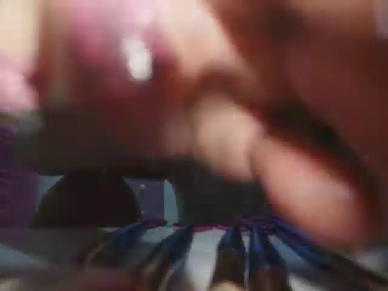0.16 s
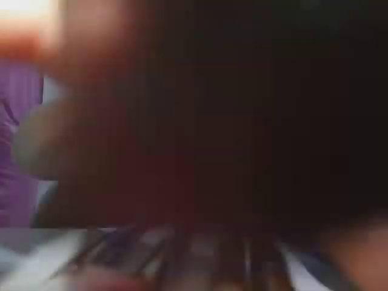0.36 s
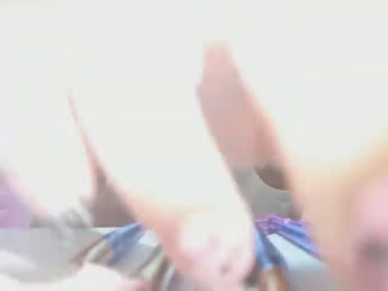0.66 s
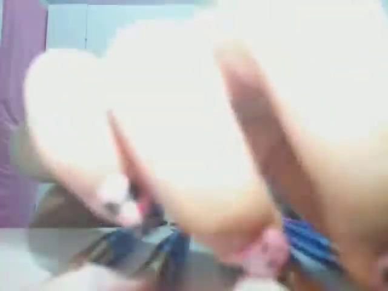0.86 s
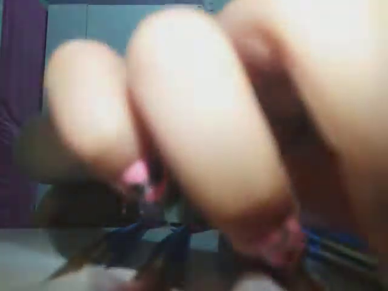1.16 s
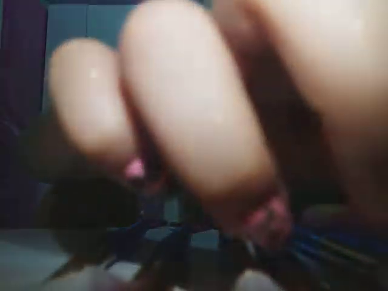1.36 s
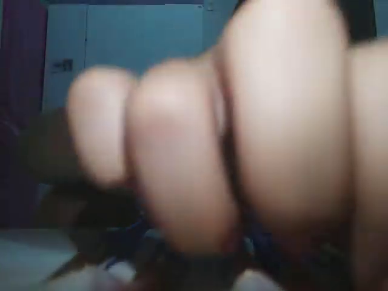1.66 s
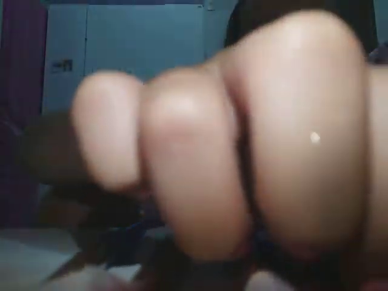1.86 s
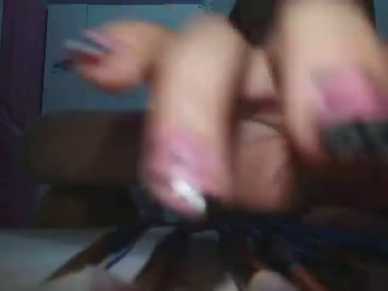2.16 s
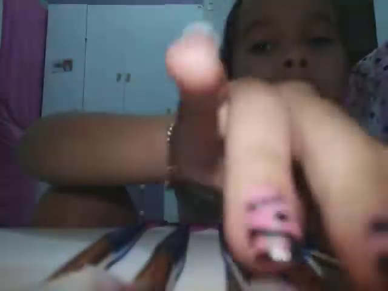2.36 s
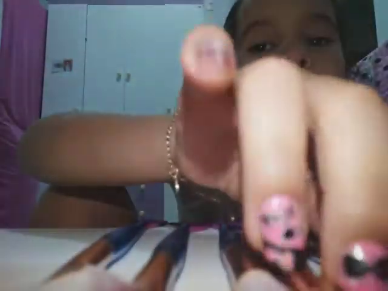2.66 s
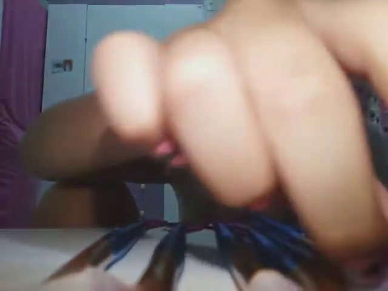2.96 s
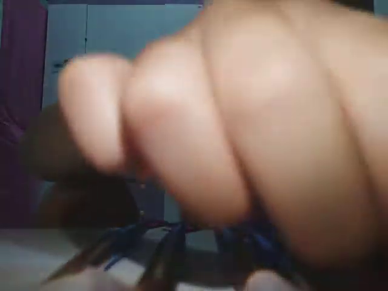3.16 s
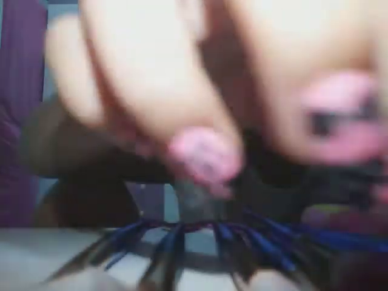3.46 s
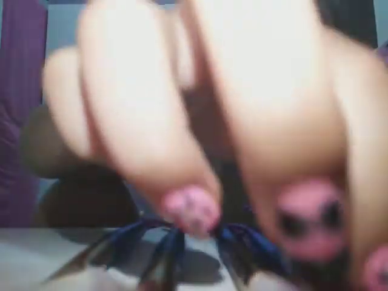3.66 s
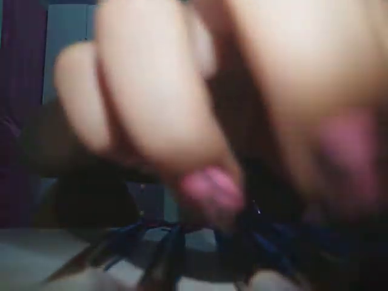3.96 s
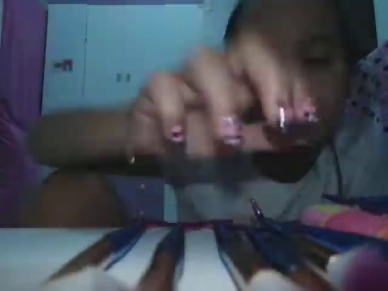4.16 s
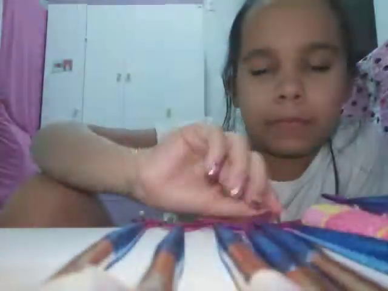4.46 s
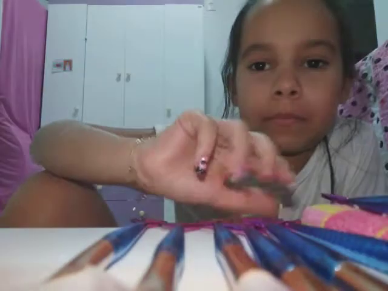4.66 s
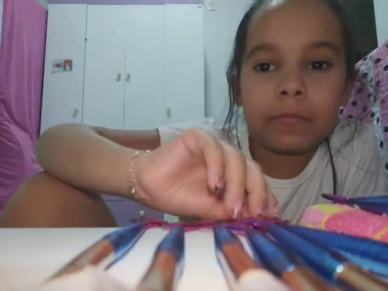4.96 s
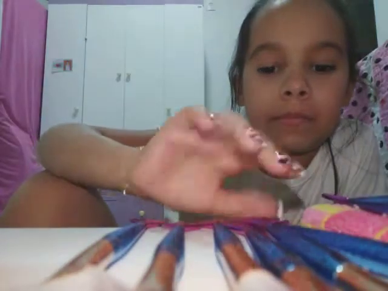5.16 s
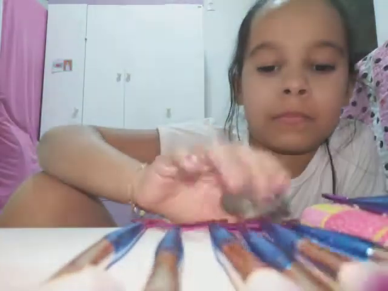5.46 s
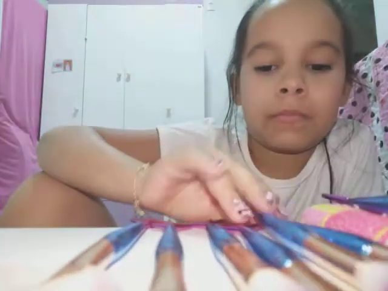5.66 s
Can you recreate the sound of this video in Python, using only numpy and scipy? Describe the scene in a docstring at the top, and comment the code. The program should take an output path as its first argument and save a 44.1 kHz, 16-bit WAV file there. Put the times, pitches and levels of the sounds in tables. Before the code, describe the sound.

A very close, dry sound of makeup brushes handled on a hollow table in a quiet bedroom, over faint low rumble and microphone hiss. Tiny ticks begin at 0.2 seconds, with a short whistling slide of nails or skin around 0.3 and a clack at 0.43. From 0.7 to 1.1 handles roll and clatter, with a bright metal clink at 0.8. After a pause, faint ticks near 1.5 lead to clacks at 1.7 to 1.85. Another hush ends at 2.2 with a brief hiss, then uneven rattling runs to 3.2, including ferrule clinks near 2.85. A hard knock with a low table thump lands at 3.26. Softer rolling follows at 3.65 to 3.95. A loud, sharp clatter breaks out at 4.4 and thins towards 4.9. After a gap, a dull roll at 5.26, crisp clacks at 5.4 and clinks at 5.6 to 5.7 finish, leaving hush.

```python
"""Brush handles on a hollow table

A quiet bedroom; a small camera stands on the table top where fingers roll and push makeup brush handles.
Handles clack and metal ferrules clink: short contacts ringing resonant modes, each with a bright tick.
Rolling is bursty noise that rings and thumps the table top, with chatter and rasp from the handles.
Nails and skin slide as hissing grain with broad whistles; room rumble and microphone hiss lie beneath.
"""
import sys
import numpy as np
from scipy import signal
from scipy.fft import rfft, irfft, next_fast_len
from scipy.io import wavfile

SR = 44100
rng = np.random.default_rng(int(sys.argv[2]) if len(sys.argv) > 2 else 0)


def int16_out(signal):
    """Quantize to a 16-bit WAV file."""
    q = np.round(np.clip(np.atleast_2d(signal).T, -1, 1) * 32767)
    wavfile.write(sys.argv[1], SR, q.astype(np.int16))


N = 255708  # samples in the scene


def gain_of(db):
    """Decibels to an amplitude factor."""
    return 10 ** (np.asarray(db) / 20)


def evened(x):
    """Scales to rms 1."""
    return x / np.sqrt(np.mean(x ** 2) + 1e-20)


def peaked(x):
    """Scales to peak 1."""
    return x / (abs(x).max() + 1e-12)


def coloured(x, points):
    """Filters by a spectrum of (f/Hz, level/dB) points, joined by straight lines over log frequency."""
    hz, db = np.transpose(points)
    size = next_fast_len(x.shape[-1])
    log_hz = np.log(np.fft.rfftfreq(size, 1 / SR) + 1)
    gain = gain_of(np.interp(log_hz, np.log(hz), db))
    return irfft(rfft(x, size) * gain, size)[..., :x.shape[-1]]


def rung(force, modes):
    """A force rings the modes of a body; each level is the height of a resonance peak."""
    out = np.zeros(len(force))
    for k, (hz, width, db) in enumerate(modes):
        r = np.exp(-np.pi * width / SR)  # a wider mode dies sooner
        pole = r * np.exp(2j * np.pi * hz / SR)
        mode = signal.lfilter([1 - r], [1, -pole], force).imag
        out += (-1) ** k * gain_of(db) * mode
    return out


def varied(modes, tune, height, spread_db):
    """No two contacts ring a body alike: pitches and heights of its modes shift a little."""
    hz, width, db = np.transpose(modes)
    count = len(hz)
    return np.transpose([hz * (1 + .018 * tune[:count]), width, db + spread_db * height[:count]])


def tinted(points, shifts, spread_db):
    """Shifts the levels of a spectrum's points at random."""
    return [(hz, db + spread_db * shift) for (hz, db), shift in zip(points, shifts)]


def dulled(force, hz):
    """A softer contact lasts longer and so loses its treble."""
    lowpass = signal.butter(3, np.clip(hz, 2000, SR / 3), fs=SR, output="sos")
    return signal.sosfilt(lowpass, force)


def bumps(per_s, spread_db, length_s):
    """Uneven rubbing or rolling force: noise in short bursts of random size."""
    size = gain_of(spread_db * np.minimum(rng.exponential(1, N), 4))
    starts = size * (rng.random(N) < per_s / SR)
    swell = signal.lfilter([1], [1, -np.exp(-1 / (length_s * SR))], starts)
    return swell * rng.standard_normal(N)


def touch(length_s, attack_s, fade_db_per_s):
    """The envelope of one touch: rise, hold, then an even fade in dB."""
    t = np.arange(round(.3 * SR + length_s * SR)) / SR  # leaves 0.3 s for the fade
    rise = np.sin(np.pi / 2 * np.minimum(t / attack_s, 1)) ** 2
    return rise * gain_of(-fade_db_per_s * np.maximum(t - length_s, 0))


# spectrum of the room and microphone noise: f/Hz, relative level/dB
HUSH_SPECTRUM = [(30, -12), (158, 5), (248, -13), (1270, -19.5), (3970, -26), (11100, -26), (15200, -25.5),
                 (16500, -50.5)]
# a faint fuzzy tone in the hush: f/Hz, width/Hz, level/dB re hush
WHINE_TONE = [(1930, 31, -17)]


def hush(level_db=-68.5):
    """Room rumble and microphone hiss with a faint tone of narrow-band noise, lower at the very start."""
    whine = gain_of(WHINE_TONE[0][2]) * evened(rung(rng.standard_normal(N), WHINE_TONE))
    noise = evened(coloured(rng.standard_normal(N), HUSH_SPECTRUM))
    rise_db = np.interp(np.arange(N) / SR, [.18, .3], [-5.5, 0])
    return gain_of(level_db + rise_db) * (noise + whine)


def bedroom(x, t60=0.16):
    """A short soft tail of sparse random reflections, duller than the direct sound."""
    t = np.arange(SR // 2) / SR
    signs = rng.choice([-1., 1.], len(t))
    taps = signs * (rng.random(len(t)) < 1 / 20) * gain_of(-60 * t / t60)
    taps = coloured(taps, [(1000, -1.5), (12000, -12.0)])
    return signal.oaconvolve(x, taps / np.linalg.norm(taps))[:N]


# bright spectrum of slides, ticks and rasp: f/Hz, level/dB
TICK_SPECTRUM = [(3000, -13), (5200, 1), (10500, 0), (15000, -0.5), (16300, -26)]
# nails and skin along the handles: start t/s, rise/s, length/s, hiss level/dB, whistle level/dB re hiss
SLIDE_TOUCHES = [(0.306, 0.082, 0.068, -47.5, 7), (2.202, 0.0035, 0.055, -48.5, -22),
                 (4.063, 0.038, 0.1, -67.5, -19)]
# broad whistles in a slide, rung twice over: f/Hz, width/Hz and level/dB of one pass
WHISTLE_MODES = [(2240, 1100, -1), (4670, 910, 0)]


def sliding(fade_db_per_s=604):
    """Nails and skin slide: dense grain is a bright hiss and rings broad whistles."""
    grain = bumps(per_s=5000, spread_db=1.5, length_s=.003)
    hiss = evened(coloured(grain, TICK_SPECTRUM))
    whistle = evened(rung(rung(grain, WHISTLE_MODES), WHISTLE_MODES))
    out = np.zeros(N)
    for s, rise_s, length_s, db, whistle_db in SLIDE_TOUCHES:
        shape = gain_of(db) * touch(length_s, rise_s, fade_db_per_s)
        now = slice(round(s * SR), round(s * SR) + len(shape))
        out[now] += shape * (hiss[now] + gain_of(whistle_db) * whistle[now])
    return out


# modes of the brush handles: f/Hz, width/Hz, level/dB
HANDLE_MODES = [(1507, 93, -7.5), (2074, 190, 1), (2574, 188, 3), (3150, 390, -6.5), (3948, 280, -1.5),
                (5310, 1100, -10.5)]


def knocking(count=5):
    """Small knocks of several handles, each with its own ring (chatter) and bright edge (rasp)."""
    ring, edge = np.zeros(N), np.zeros(N)
    for tune, height, tints in rng.standard_normal((count, 3, len(HANDLE_MODES))):
        force = bumps(per_s=60, spread_db=2.5, length_s=.002)
        ring += rung(force, varied(HANDLE_MODES, tune, height, spread_db=5.0))
        edge += coloured(force, tinted(TICK_SPECTRUM, tints, spread_db=5.0))
    return evened(ring), evened(edge)


# low thump of the hollow table top: f/Hz, width/Hz, level/dB
THUMP_MODES = [(139.2, 28.5, 3.5), (170.5, 50.4, 4), (241.6, 92.5, -6.5)]
# ring of the table top: f/Hz, width/Hz, level/dB
RING_MODES = [(381.9, 8.3, -2.5), (470.5, 47, -5), (690.6, 61.2, 3), (774, 73, 2.5), (1233, 128, -9.5)]
# handles rolled under the fingers: start t/s, length/s, table ring level/dB, thump level/dB re ring,
# hardness (0 soft, 1 hard; more than 1 chatters and rasps louder still)
ROLL_TOUCHES = [(0.2, 0.2, -51, 7.5, 0.7), (0.403, 0.0095, -33, -9.5, 0.1), (0.684, 0.055, -25, -5.5, 0.21),
                (0.762, 0.076, -33, -12.5, 0.58), (0.86, 0.075, -38.5, -12.5, 0.64),
                (0.955, 0.15, -37.5, -3.5, 0.41), (1.513, 0.1, -54.5, 1.5, 0.7),
                (1.61, .085, -38, -3, 0.49), (1.693, 0.21, -40, -8.5, 0.47),
                (2.203, 0.055, -39.5, -20.5, 0), (2.272, 0.039, -41, 3.5, 0.98),
                (2.34, 0.072, -33, -7.5, 0.78), (2.521, 0.085, -38.5, -17, 0.74),
                (2.776, 0.13, -35, 0.5, 0.69), (2.921, 0.086, -31.5, -6.5, 0.1),
                (3.065, 0.042, -32.5, -0.5, 0.4), (3.167, 0.039, -30.5, -1, 0.5),
                (3.253, 0.033, -37.5, 15.5, 0.6), (3.626, 0.011, -50, 18, 0.3),
                (3.654, 0.018, -32.5, -7.5, 0.48), (3.719, 0.036, -28, -11.5, 0.01),
                (3.835, 0.06, -41, 5.5, 0.51), (3.901, 0.045, -37, 6, 0.2), (4.352, 0.036, -34, -8, 0.24),
                (4.413, 0.082, -26.5, -3, 1), (4.493, .07, -36, 0.5, 0.68), (4.806, 0.094, -32.5, -2, 0.75),
                (4.896, 0.044, -27.5, -10, 0.73), (5.233, 0.024, -44.5, 10.5, 0.21),
                (5.264, .12, -20.5, -18, 0.14), (5.395, 0.073, -31.5, -5, 0.97),
                (5.556, 0.12, -27, -8.5, 0.72), (5.677, 0.051, -39, -4, 1.6)]


def rolling():
    """Handles roll and shake the table top; harder contacts chatter and rasp more and brighter."""
    chatter_soft_db, chatter_hard_db = -14.5, -2.5  # re table ring, at hardness 0 and 1
    rasp_soft_db, rasp_hard_db = -35.5, -17  # likewise
    table_fade, handle_fade = 502.5, 1099.5  # dB/s: the handles fall silent sooner than the table top
    load = bumps(per_s=1500, spread_db=1.3, length_s=.006)
    thump = evened(rung(bumps(per_s=250, spread_db=1.2, length_s=.01), THUMP_MODES))
    hard, rasp = knocking()
    soft = evened(rung(dulled(load, hz=2980), HANDLE_MODES))
    out = np.zeros(N)
    chance = rng.standard_normal((len(ROLL_TOUCHES), 2, len(RING_MODES)))
    for (s, length_s, db, thump_db, hardness), (tune, height) in zip(ROLL_TOUCHES, chance):
        share = np.clip(hardness, 0, 1)
        # soft contacts swell over much of their length, hard ones start almost at once
        rise_s = 0.006 + 0.9 * length_s * (1 - share) ** 2
        table_shape = gain_of(db) * touch(length_s, rise_s, table_fade)
        handle_shape = gain_of(db) * touch(length_s, rise_s, handle_fade)
        now = slice(round(s * SR), round(s * SR) + len(table_shape))

        chatter_db = chatter_soft_db + (chatter_hard_db - chatter_soft_db) * hardness
        rasp_db = rasp_soft_db + (rasp_hard_db - rasp_soft_db) * hardness
        chatter = share * hard[now] + (1 - share) * soft[now]
        handles = gain_of(chatter_db) * chatter + gain_of(rasp_db) * rasp[now]

        ring = evened(rung(load[now], varied(RING_MODES, tune, height, spread_db=3.5)))
        table = ring + gain_of(thump_db) * thump[now]
        out[now] += table_shape[:len(table)] * table + handle_shape[:len(table)] * handles
    return out


def add(mix, s, sound):
    """Mixes a sound in at a time in seconds."""
    part = mix[round(s * SR):][:len(sound)]
    part += sound[:len(part)]


def struck(rows, body):
    """A snap and a rough contact ring a body, each time a little differently, and push the table top."""
    snap_s, contact_s, scrape_s, push_s = 0.00008, 0.0079, 0.0059, 0.0042
    grit_db, thump_db = -11, -14  # grit re snap, thump re table ring
    out, t = np.zeros(N), np.arange(5000) / SR
    chance = rng.standard_normal((len(rows), 5, 10))
    noises = rng.standard_normal((len(rows), 3, len(t)))
    for row, shifts, (grit, hiss, rough) in zip(rows, chance, noises):
        s, db, tick_db, ring_db = row
        tune, height, table_tune, table_height, tints = shifts
        force = np.exp(-t / snap_s) + gain_of(grit_db) * grit * np.exp(-(t / contact_s) ** 2)
        force = dulled(force, 14000 * gain_of(0.48 * tick_db))  # a stronger tick, a harder contact
        sound = peaked(rung(force, varied(body, tune, height, spread_db=2.0)))

        scrape = np.exp(-t / scrape_s)  # the tick starts sharply and leaves a short scrape
        tick = coloured(hiss, tinted(TICK_SPECTRUM, tints, spread_db=4.5)) * scrape
        sound += gain_of(tick_db) * peaked(tick)

        push = rough * t * np.exp(-t / push_s)  # the table top is loaded more slowly
        table = peaked(rung(push, varied(RING_MODES, table_tune, table_height, spread_db=2.5)))
        table += gain_of(thump_db) * peaked(rung(push, THUMP_MODES))
        add(out, s, gain_of(db) * (sound + gain_of(ring_db) * table))
    return out


# modes of the metal ferrules: f/Hz, width/Hz, level/dB
FERRULE_MODES = [(2240, 600, 0.5), (3930, 370, 9.5), (5100, 1570, 1.5)]
# clinks: t/s, ferrule peak level/dB, bright tick level/dB re peak, table ring level/dB re peak
CLINK_EVENTS = [(0.791, -6.5, -7.5, -9), (1.459, -62, 23.5, -29), (1.531, -40.5, -12, -3.5),
                (2.8244, -18.5, -27, 0.5), (2.8857, -17.5, -20.5, -4.5), (2.8998, -17.5, -11.5, -11.5),
                (5.5782, -15, -25.5, -11), (5.6529, -12, -13.5, -11), (5.7056, -25, -20, -21)]


def clinks():
    """Metal ferrules are struck and ring their own modes."""
    return struck(CLINK_EVENTS, FERRULE_MODES)


# clacks: t/s, handle peak level/dB, bright tick level/dB re peak, table ring level/dB re peak
CLACK_EVENTS = [(0.2044, -52.5, 7, 12.5), (0.245, -38.5, 13, 1.5), (0.2673, -37.5, 2.5, 10),
                (0.2952, -31.5, -7.5, 8.5), (0.4257, -19.5, -21.5, -10), (0.712, -20.5, -16, -3),
                (0.7244, -21.5, -4.5, -8.5), (0.7562, -25.5, -2.5, -6), (0.8584, -20.5, -22.5, 2.5),
                (0.8807, -23, -36, -3), (0.9, -26.5, -15, -11.5), (0.955, -30, -22, -7.5),
                (1.0055, -17.5, -22, -4), (1.0478, -30.5, -7.5, -0.5), (1.0853, -21, -13, -4),
                (1.166, -49.5, -17, 12), (1.4853, -44.5, 20, -6), (1.557, -50, -17, 8),
                (1.7048, -29, -8, 7.5), (1.7314, -12.5, -23.5, -11.5), (1.7741, -17.5, -18.5, -2),
                (1.8417, -22.5, -18, -3.5), (1.9375, -45, -13, 12), (1.97, -36, -51, -0.5),
                (2.205, -54.5, 31.5, 17.5), (2.29, -29, -7, 7.5), (2.3434, -29, -56, 5.5),
                (2.3722, -18.5, -27, -1), (2.4014, -40, 8.5, 12), (2.4363, -24.5, -11, 4),
                (2.471, -21.5, -8.5, -5.5), (2.49, -24, -18, -4), (2.588, -21, -11, -47),
                (2.617, -23.5, -25, -4.5), (2.6439, -30, -20, 3), (2.6972, -26, -20, -9.5),
                (2.718, -27, -30.5, 2.5), (2.7696, -30.5, -21, 3), (2.7923, -26.5, -37, -4),
                (2.9374, -21, -10, 6.5), (3.05, -24, -5.5, 5), (3.1267, -20.5, -16, 0),
                (3.2615, -5.5, -20.5, -6), (3.34, -31, -35, 2.5), (3.371, -35.5, -17, 9),
                (3.397, -37, -23.5, 6.5), (3.8421, -24, -55.5, 2.5), (3.875, -32.5, -36, 4),
                (3.9194, -30.5, -35.5, 2), (3.9499, -32, -29, 3.5), (4.07, -51, -63.5, -19),
                (4.4163, -11.5, -14, 1.5), (4.4331, -5, -9.5, -5), (4.4518, -16.5, -20.5, -14.5),
                (4.469, -17.5, -5, -21.5), (4.5101, -15, -7.5, -6.5), (4.5311, -19.5, -5.5, 2),
                (4.544, -19, -19.5, -8.5), (4.64, -29, -17, -4.5), (4.664, -25, -22, -4.5),
                (4.721, -29, -20.5, -9), (4.7442, -30, -46, -3.5), (4.7766, -30.5, -24, -9),
                (4.801, -28.5, -15, -9), (4.811, -24, -15, -9.5), (4.909, -16, -6, -5.5),
                (5.398, -9, -8, -26.5), (5.4164, -16, -19, -3.5), (5.4365, -10.5, -12, -7.5),
                (5.47, -25, -29, -4), (5.538, -22, -26, -3)]


def clacks():
    """Handle strikes handle, ringing the handle modes."""
    return struck(CLACK_EVENTS, HANDLE_MODES)


def scene():
    """Everything reaches both channels alike; the table passes little deep bass to the microphone."""
    brushes = coloured(clacks() + clinks() + rolling(), [(50, -17), (125, -1.5)])
    mix = brushes + gain_of(-16.5) * bedroom(brushes) + sliding() + hush()
    return np.array([mix, mix])


# a broad boost and a narrow dip in the left channel alone: f/Hz, width/Hz, level/dB
LEFT_BANDS = [(1570, 520, 4.5), (9670, 710, -8)]


def record(dry):
    """The left channel has a broad boost near 1.6 kHz and a narrow dip near 9.7 kHz; both end at 16.7 kHz."""
    left = dry[0]
    for hz, width, db in LEFT_BANDS:
        band = signal.butter(1, [hz - width / 2, hz + width / 2], "bandpass", fs=SR, output="sos")
        left = left + (gain_of(db) - 1) * signal.sosfiltfilt(band, left)
    edge = signal.firwin(511, 16700, window=("kaiser", 9), fs=SR)  # lowpass of both channels
    return signal.oaconvolve(np.array([left, dry[1]]), edge[None], "same")


dry = scene()
out = record(dry)
int16_out(out)
```